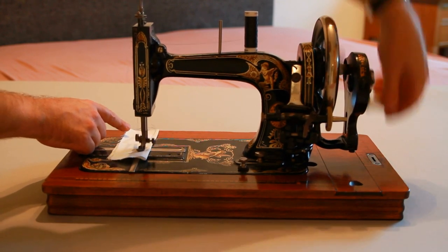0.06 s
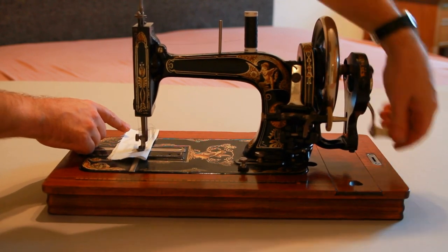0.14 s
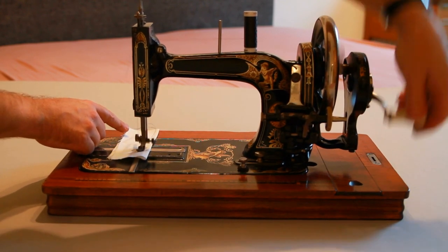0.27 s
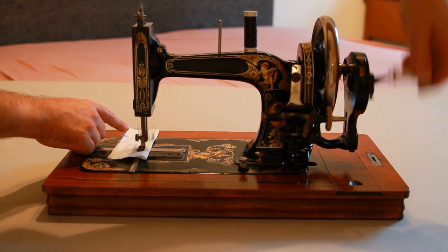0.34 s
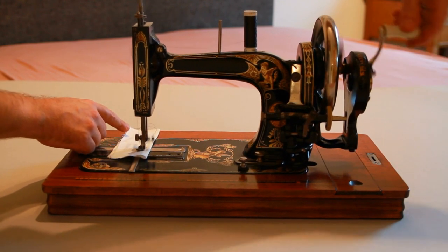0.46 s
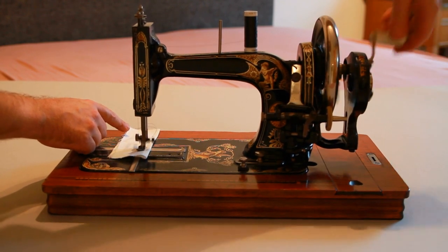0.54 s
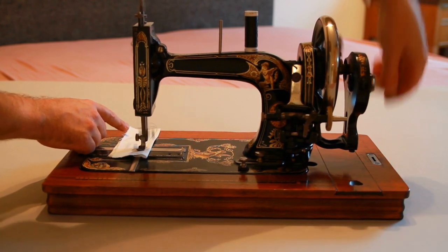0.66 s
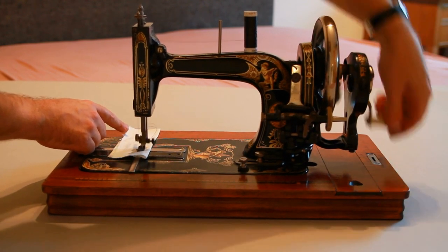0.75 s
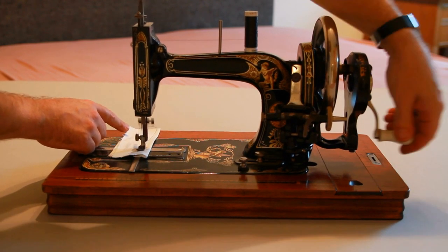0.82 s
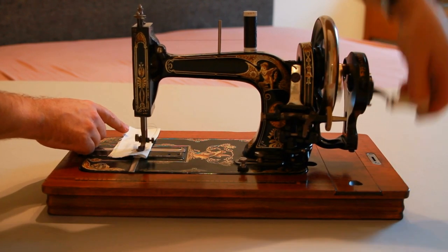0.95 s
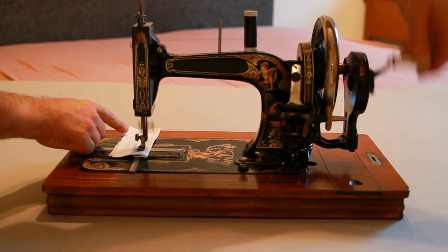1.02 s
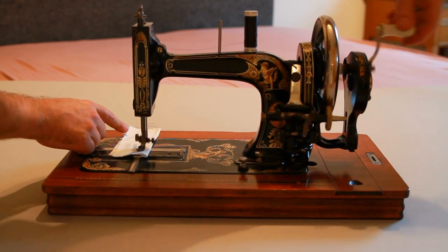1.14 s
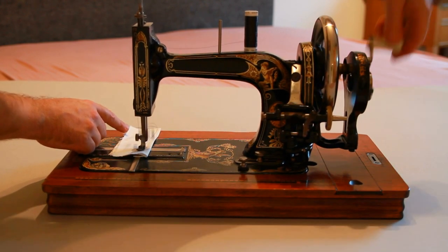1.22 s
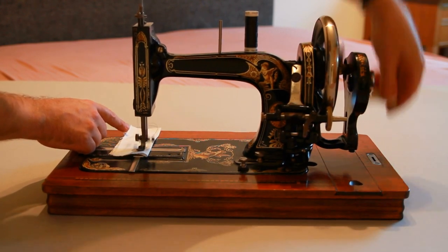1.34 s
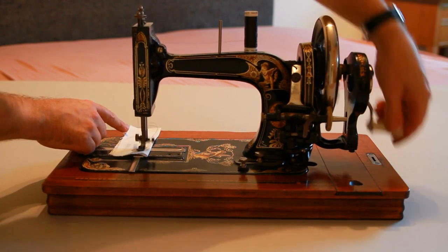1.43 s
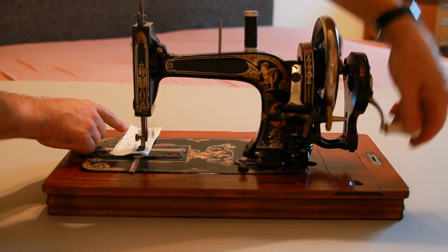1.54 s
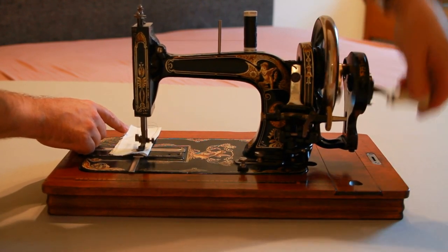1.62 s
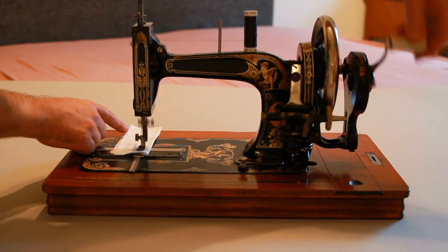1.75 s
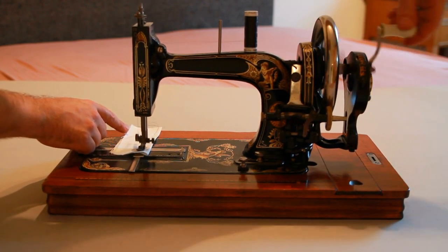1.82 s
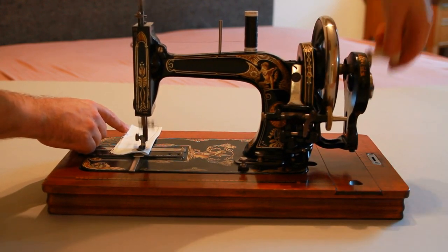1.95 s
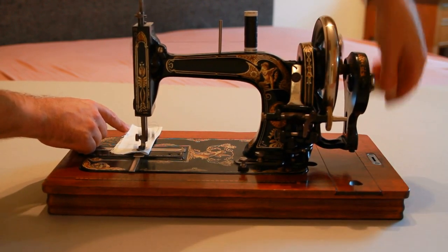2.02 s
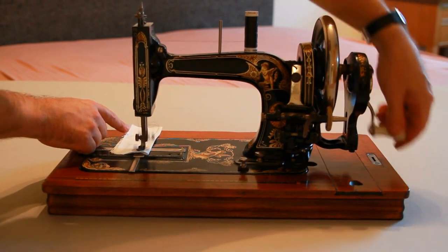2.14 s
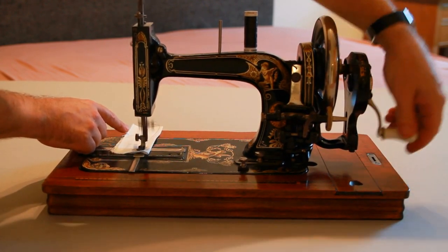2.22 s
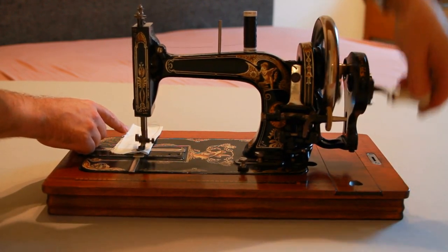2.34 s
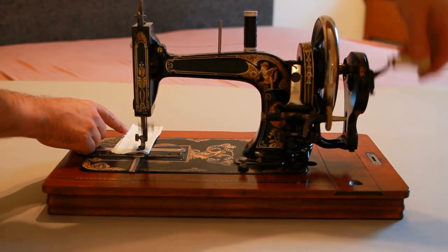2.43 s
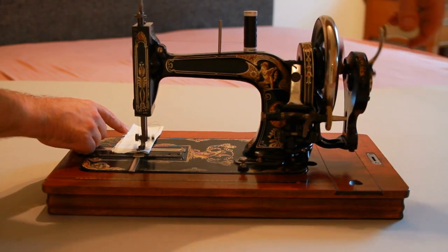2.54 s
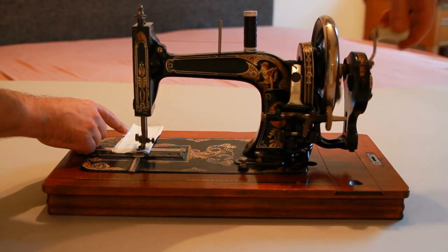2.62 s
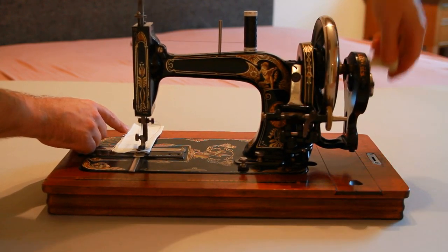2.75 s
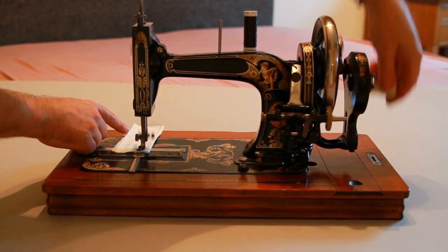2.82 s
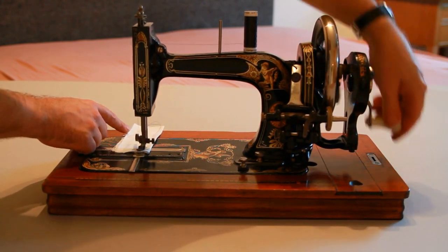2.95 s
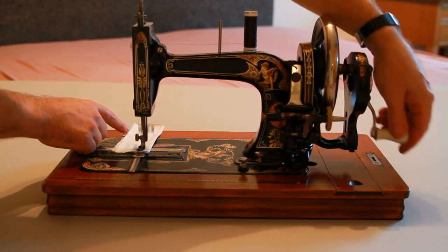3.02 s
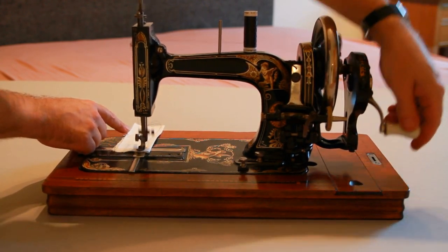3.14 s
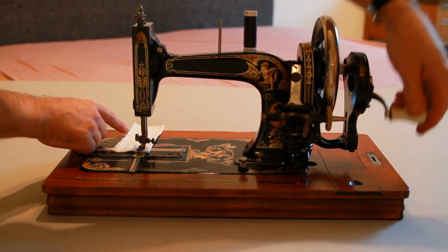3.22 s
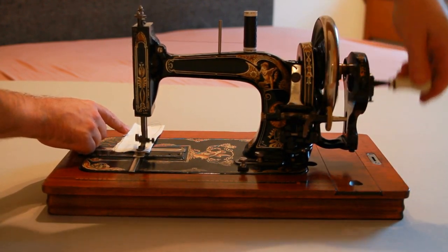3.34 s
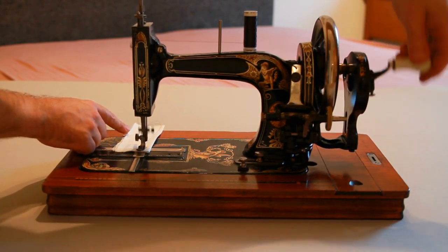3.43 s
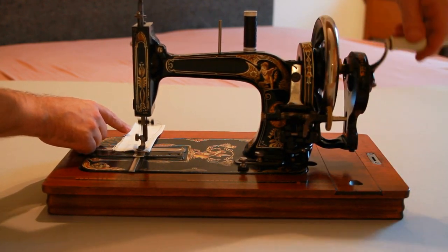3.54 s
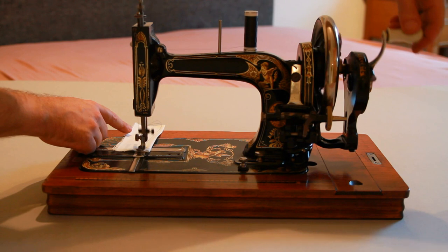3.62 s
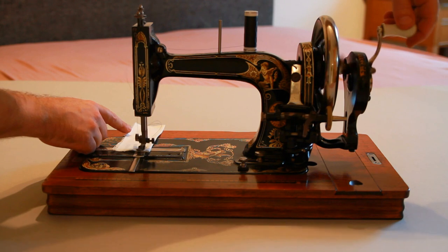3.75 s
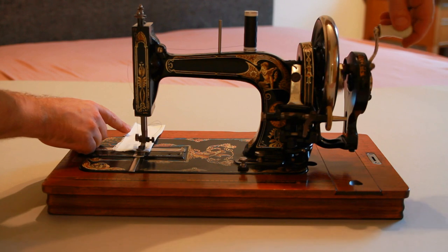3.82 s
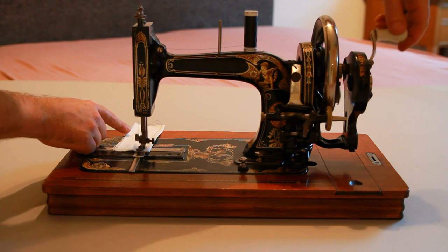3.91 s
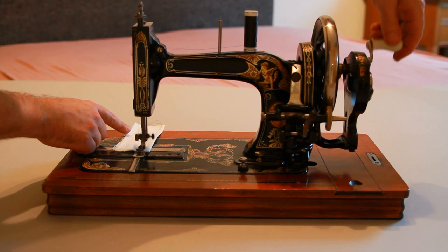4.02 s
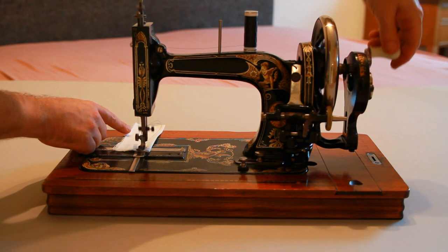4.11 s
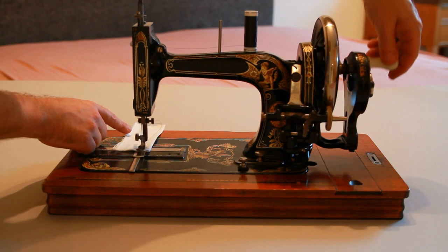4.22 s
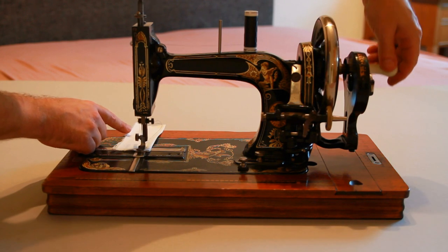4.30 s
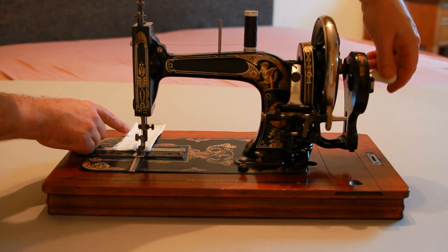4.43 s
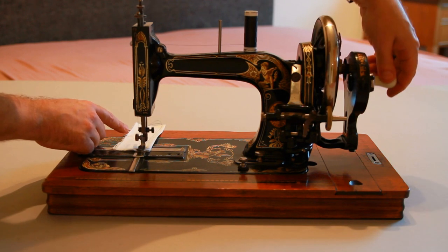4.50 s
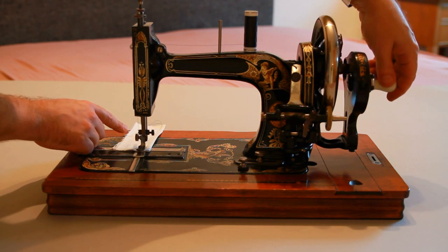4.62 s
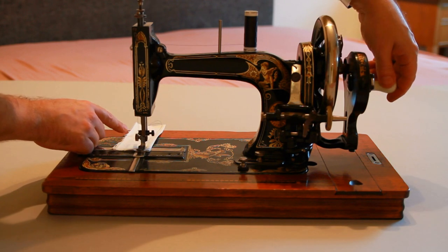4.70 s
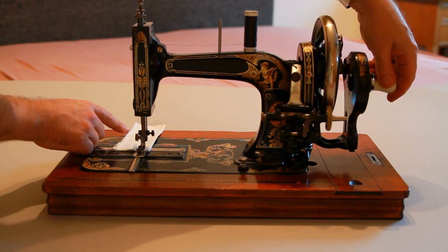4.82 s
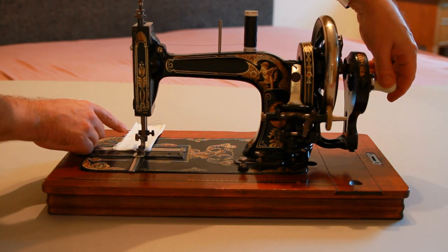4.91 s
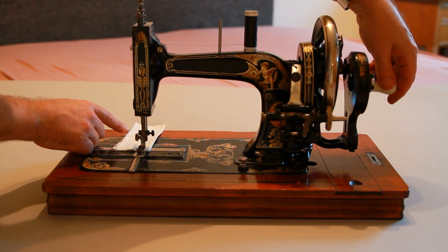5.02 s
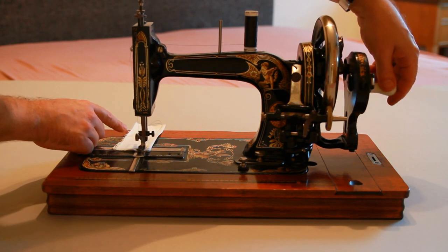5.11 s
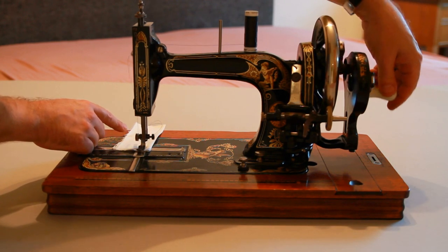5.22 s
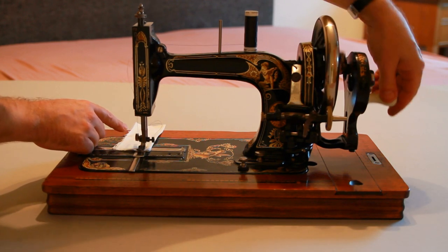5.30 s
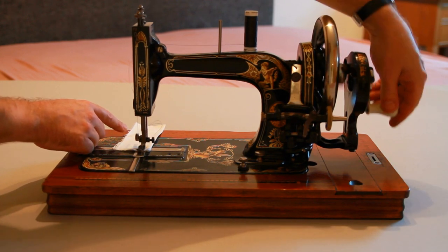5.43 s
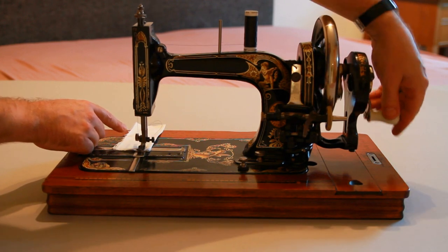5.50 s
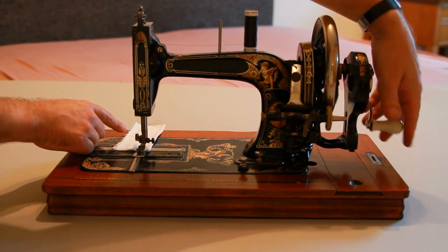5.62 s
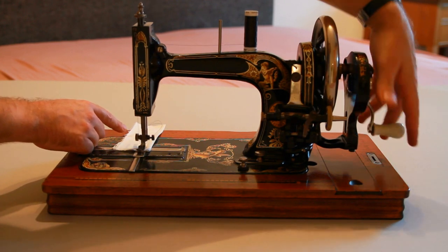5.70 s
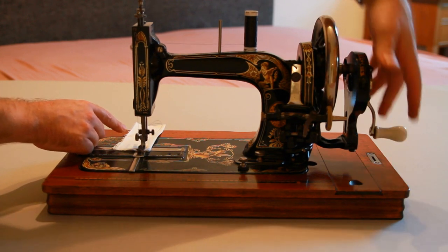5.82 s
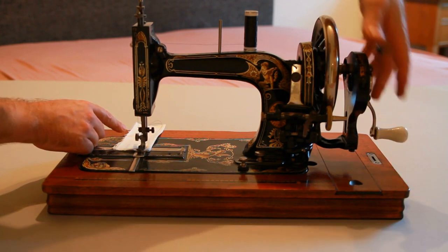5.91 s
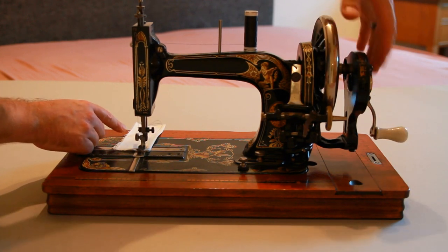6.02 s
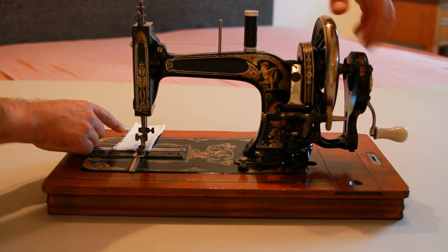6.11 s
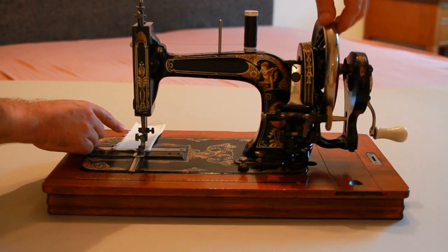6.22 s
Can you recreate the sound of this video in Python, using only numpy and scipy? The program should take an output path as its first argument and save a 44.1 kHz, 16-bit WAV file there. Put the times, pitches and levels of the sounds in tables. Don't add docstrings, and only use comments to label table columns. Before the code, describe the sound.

Close up in a quiet bedroom, a cast-iron hand-cranked sewing machine stitches at four to five stitches a second, each a cluster of sharp steel ticks, clacks and loose rattles. Gears whirr and the wooden base rumbles. It slows and stops before four seconds; then the crank clinks, a few dull knocks, tiny creaks and snaps follow over faint fan noise.

```python
import sys
import numpy as np
from scipy import signal
from scipy.fft import rfft, irfft
from scipy.io import wavfile

SR = 44100
rng = np.random.default_rng(int(sys.argv[2]) if len(sys.argv) > 2 else 0)


def store_pcm(level_fs):
    pcm = np.round(np.clip(level_fs, -1, 1) * 32767).astype(np.int16)
    wavfile.write(sys.argv[1], SR, np.atleast_2d(pcm).T)


def linear_from_db(decibels):
    return 10 ** (np.asarray(decibels, float) / 20)


N = 276066


def rms_one(x):
    return x / np.sqrt(np.mean(x ** 2) + 1e-20)


def at_hz(points, hz):
    point_hz, values = np.array(points).T
    return np.interp(np.log(np.maximum(hz, 1)), np.log(point_hz), values)


def band(x, low_hz, high_hz):
    return signal.sosfilt(signal.butter(2, [low_hz, high_hz], "band", fs=SR, output="sos"), x)


def coloured(x, spectrum):
    gain = linear_from_db(at_hz(spectrum, np.fft.rfftfreq(N, 1 / SR)))
    return rms_one(irfft(rfft(x) * gain, N))


def resonate(x, hz, width_hz):
    r, w = np.exp(-np.pi * width_hz / SR), 2 * np.pi * hz / SR
    return signal.lfilter([0, np.sin(w)], [1, -2 * r * np.cos(w), r * r], x + 1e-18)


def drift(per_s):
    r = np.exp(-2 * np.pi * per_s / SR)
    wander = signal.lfilter([1], [1, -2 * r, r * r], rng.standard_normal(N + SR))
    return rms_one(wander[SR:])


def grains(per_s, spread_db):
    sizes = linear_from_db(spread_db * np.minimum(rng.exponential(1, N), 5)) * rng.choice([-1, 1], N)
    return rms_one(sizes * (rng.random(N) < per_s / SR))


def bursts(seconds, gains, fall_s, rise_s):
    clicks = np.full(N, 1e-12)
    np.add.at(clicks, (np.asarray(seconds) * SR).astype(int), gains)
    fall, rise = np.exp(-1 / (fall_s * SR)), np.exp(-1 / (rise_s * SR))
    return signal.lfilter([1 - rise], np.convolve([1, -fall], [1, -rise]), clicks)


def strike(seconds, level_db, modes, luck_db, fall_s):
    noise = rng.standard_normal(N)
    luck = rng.standard_normal((len(seconds), len(modes)))
    out = np.zeros(N)
    for k, (hz, width_hz, db) in enumerate(modes):
        push = bursts(seconds, linear_from_db(level_db + db + luck_db * luck[:, k]), fall_s, rise_s=.0001)
        out += resonate(noise * push, hz, width_hz)
    return out


def ring_each(seconds, level_db, ring_hz, width_hz, rise_cycles=1.0):
    out, t = np.zeros(N + SR), np.arange(SR // 4) / SR
    for s, db, hz in zip(seconds, level_db, ring_hz):
        i = int(s * SR)
        swell = 1 - np.exp(-t * hz / rise_cycles)
        out[i:i + len(t)] += linear_from_db(db) * np.sin(2 * np.pi * hz * t) * np.exp(-np.pi * width_hz * t) * swell
    return out[:N]


# start in seconds, length in seconds, level in dB.
HUM_SWELLS = [
    (3.772, 0.094, -48),
    (4.04, 0.32, -57),
    (4.493, 0.41, -54),
    (5.09, 0.13, -57),
    (5.71, 0.13, -61),
    (6.107, 0.28, -53),
]


def hum_level():
    t, edge_db_per_s = np.arange(N) / SR, 300
    swells = []
    for s, length, db in HUM_SWELLS:
        outside_s = np.maximum(0, np.maximum(s - t, t - s - length))
        swells.append(db - edge_db_per_s * outside_s)
    return np.max(swells, axis=0)


# frequency in Hz, level in dB per Hz.
FAN = [(18, -54), (30, -6), (118, -34), (163, -18.5), (255, -30.5), (323, -20), (399, -15.5), (625, 7),
       (792, 8.5), (928, -6), (1210, -4.5), (1530, -10.5), (12700, -16.5), (15200, -20.5), (16500, -52)]


def background():
    hum_hz, hum_width_hz = 170, 14
    hum = resonate(resonate(rng.standard_normal(N), hum_hz, hum_width_hz), hum_hz, hum_width_hz)
    whine = resonate(rng.standard_normal(N), 930, width_hz=27.1)
    fan = coloured(rng.standard_normal(N), FAN) + linear_from_db(-5.5) * rms_one(whine)
    return linear_from_db(-56) * fan + linear_from_db(hum_level()) * rms_one(hum)


# frequency in Hz, time to fade by 60 dB in seconds.
ROOM_FADE = [(200, 0.62), (1000, 0.33), (4000, 0.21), (10000, 0.16), (16000, 0.11)]


def room(x):
    t, edges = np.arange(SR // 2) / SR, 100 * 2 ** np.arange(0, 7.6, .5)
    noise, tail = rng.standard_normal(len(t)), np.zeros(len(t))
    for low, high in zip(edges, edges[1:]):
        tail += band(noise, low, high) * linear_from_db(-60 * t / at_hz(ROOM_FADE, np.sqrt(low * high)))
    tail *= 1 - np.exp(-(t / .011) ** 2)
    return signal.fftconvolve(x, tail / np.sqrt(np.sum(tail ** 2)))[:N]


# time in seconds, force in dB.
CRANK_FORCE = [(0.0, 2.5), (1.0, -0.5), (2.0, 0), (2.74, -3), (3.2, -5.5), (3.47, -6), (3.59, -10),
               (3.75, -13.5), (3.96, -5.5), (4.06, -2), (4.2, -20.5), (4.6, -29), (5.32, -23.5),
               (5.4, -20.5), (5.67, -7.5), (5.76, -17), (5.86, -24), (6.26, -24)]


def motion():
    t = np.arange(N) / SR
    force_db = np.interp(t, *np.transpose(CRANK_FORCE))
    rise_s, shuttle_fall_s = 0.021, 0.02
    push_s, stroke_s = np.array(FEED)[1::2, 0], np.array(SHUTTLE)[:, 0]
    feed = bursts(push_s - rise_s, 0.99, 0.028, rise_s)
    shuttle = bursts(stroke_s - rise_s, 0.91, shuttle_fall_s, rise_s)
    return_s = stroke_s + 0.28 * np.gradient(stroke_s)
    shuttle += bursts(return_s, linear_from_db(-16), shuttle_fall_s, rise_s)
    shuttle += linear_from_db(-12.5) * np.exp(-t / shuttle_fall_s)
    knock_s, knock_db = np.transpose(KNOCKS)[:2]
    gear_jolts = bursts(knock_s, linear_from_db(knock_db - 24), fall_s=0.027, rise_s=0.0069)

    def loaded(steady_db, feed_load_db, shuttle_load_db):
        return linear_from_db(steady_db) * (1 + linear_from_db(feed_load_db) * feed + linear_from_db(shuttle_load_db) * shuttle)

    rumble = loaded(-33 + force_db, -5.5, -13)
    whirr = loaded(-46 + force_db, 8.5, 3)
    slide = loaded(-43 + 0.46 * force_db, 13.5, 29.5)
    return 20 * np.log10([rumble + gear_jolts, whirr, slide])


# frequency in Hz, width in Hz, level in dB.
BASE = [(123.8, 8.4, -12.5), (181.5, 26, -10), (214.2, 5.4, -3.5), (252.7, 29, -1), (285.4, 27, 0),
        (323, 17.6, 0.5), (370.7, 13.2, -5.5), (380, 63, -6), (447.6, 34.4, -2.5), (587, 22, -6),
        (711, 39, -9.5), (777.5, 17, -16)]


def wooden_base(rumble_db):
    teeth = grains(per_s=350, spread_db=0.5)
    loads = [linear_from_db(1.83 * drift(per_s=6.2)) for _ in range(4)]
    rumble = np.zeros(N)
    for k, (hz, width_hz, db) in enumerate(BASE):
        mode = resonate(teeth * loads[k % 4], hz, width_hz)
        rumble += linear_from_db(db) * np.sqrt(width_hz) * mode * (-1) ** k
    return linear_from_db(rumble_db + 1.5) * rms_one(rumble)


# frequency in Hz, level in dB per Hz.
WHIRR = [(290, -7), (500, -6.5), (585, -6), (911, -6.5), (977, -10), (1430, -5.5), (4000, -26.5),
         (5200, -23), (8800, -120)]
# frequency in Hz, level in dB per Hz.
SLIDE = [(1500, -1), (2600, 4), (5000, 2), (6500, -2.5), (10000, -2), (15000, -6), (16500, 1.5)]


def running_gear(whirr_db, slide_db):
    mesh = coloured(grains(per_s=1500, spread_db=2.5), WHIRR)
    streaks = np.zeros(N)
    for hz in np.geomspace(600, 2400, num=7):
        streaks += linear_from_db(4.5 * drift(per_s=6)) * band(mesh, hz, hz * 1.12)
    grit = coloured(grains(per_s=9000, spread_db=2.0), SLIDE)
    ringing = rms_one(sum(linear_from_db(db) * np.sqrt(w) * resonate(grit, hz, w) for hz, w, db in STEEL))
    whirr = linear_from_db(whirr_db + 0.4) * rms_one(mesh + 0.27 * streaks)
    return whirr + linear_from_db(slide_db - 12.0) * (grit + 0.2 * ringing)


# start in seconds, peak level in dB, ringing pitch in Hz.
THUMPS = [(0.032, -26, 304), (0.057, -25, 333), (0.098, -21.5, 317), (0.136, -24.5, 288), (0.16, -27, 310),
          (0.184, -27, 328), (0.238, -27, 314), (0.268, -22, 326), (0.299, -24.5, 345), (0.361, -26, 244),
          (0.402, -28, 307), (0.484, -28, 307), (0.521, -19.5, 337), (0.57, -30, 284), (0.601, -32, 336),
          (0.66, -27, 223), (0.69, -24, 320), (0.8, -20, 315), (0.863, -23, 348), (0.89, -27, 326),
          (0.95, -22, 334), (0.984, -21.5, 226), (1.029, -31.5, 260), (1.146, -39.5, 304),
          (1.235, -42, 383), (1.266, -32, 321), (1.315, -26, 320), (1.363, -21, 309), (1.446, -29, 275),
          (1.539, -32.5, 297), (1.638, -24, 280), (1.67, -31, 237), (1.73, -29, 351), (1.823, -38, 307),
          (1.856, -30, 341), (1.912, -27, 334), (1.971, -25.5, 265), (2.074, -22.5, 318), (2.122, -26, 250),
          (2.15, -25.5, 285), (2.208, -23, 334), (2.278, -27, 323), (2.324, -20, 290), (2.392, -43, 348),
          (2.629, -40, 317), (2.748, -25, 302.5), (2.886, -27, 301), (2.937, -24, 339), (3.011, -28.5, 295),
          (3.081, -29.5, 331), (3.235, -26, 320), (3.261, -25, 294), (3.398, -37, 302), (3.433, -36, 275),
          (3.46, -43, 277), (3.495, -33, 299)]
# start in seconds, peak level in dB, ringing pitch in Hz.
TAPS = [(0.098, -24, 774), (0.133, -18, 576), (0.18, -29, 472), (0.295, -29, 724), (0.338, -34, 474),
        (0.511, -42, 420), (0.591, -30, 611), (0.642, -38, 608), (0.75, -20, 593), (0.774, -20, 437),
        (0.819, -21, 538), (0.93, -29, 600), (0.967, -30, 630), (1.003, -26.5, 452), (1.219, -36, 450),
        (1.375, -29, 453), (1.411, -23, 587), (1.588, -34, 596), (1.613, -31, 435), (1.668, -25, 446),
        (1.705, -42, 454), (1.824, -31, 800), (1.85, -33, 690), (1.947, -32, 435), (2.082, -33, 700),
        (2.111, -26, 585), (2.139, -18.5, 577), (2.168, -22, 619), (2.323, -30, 720), (2.397, -41, 657),
        (2.482, -33, 440), (2.769, -38, 587), (2.883, -33, 587), (2.915, -25.5, 697), (2.935, -27, 600),
        (2.979, -25, 550), (3.029, -27, 597), (3.364, -21, 443), (3.4, -26, 450), (3.473, -34, 530)]


def jolts():
    s, db, hz = np.transpose(THUMPS)
    thumps = ring_each(s - .004, db + 2.5, hz, width_hz=18.8, rise_cycles=3.27)
    s, db, hz = np.transpose(TAPS)
    return thumps + ring_each(s, db - .5, hz, width_hz=43, rise_cycles=2.5)


# start in seconds, peak level in dB, main pitch in Hz, brightness in dB.
KNOCKS = [(3.617, -47, 300, -17), (3.782, -28, 313, -6), (3.986, -29, 294, -11), (4.02, -23, 273, -8),
          (4.213, -34, 320, 3), (4.393, -37, 438, -4), (4.393, -36, 317, -25), (4.394, -31, 605, -25),
          (4.491, -33.5, 318, -21), (4.984, -46, 570, 11), (5.389, -31, 330, -2), (5.439, -32.5, 254, -9),
          (5.566, -30, 291, 1.5), (5.666, -31, 336, 0), (5.727, -30, 323, 1.5), (5.885, -31, 294, -19),
          (5.902, -27, 253, -28), (6.008, -31, 302, -5)]


def knocks():
    s, peak_db, ring_hz, bright_db = np.transpose(KNOCKS)
    thud = ring_each(s, peak_db, ring_hz, width_hz=45)
    upper_modes = [m for m in BASE if m[0] > 430]
    return thud + strike(s, peak_db + bright_db - 20.5, upper_modes, luck_db=1.5, fall_s=0.00078)


# start in seconds, level in dB, pitch in Hz, fall time in seconds.
CREAKS = [
    (3.601, -70.5, 1790, 0.18),
    (3.811, -58, 1430, 0.012),
    (4.2, -70, 1770, 0.13),
    (5.392, -73, 1400, .01),
    (5.436, -68, 1440, 0.022),
    (5.507, -76, 1430, .02),
    (5.89, -73, 1810, 0.021),
]


def creaks():
    out, t = np.zeros(N + SR), np.arange(SR // 3) / SR
    for s, db, hz, fall_s in CREAKS:
        i = int(s * SR)
        rub = linear_from_db(db) * rng.standard_normal(len(t)) * np.exp(-t / fall_s)
        out[i:i + len(t)] += resonate(rub, hz, width_hz=220)
    return out[:N]


# frequency in Hz, width in Hz, level in dB.
STEEL = [(3800, 350, -6), (4300, 300, -6), (4900, 300, -5), (5680, 350, -5), (7050, 280, -5),
         (7950, 400, -6), (9000, 350, -5), (10230, 220, -2), (11150, 400, -3), (12550, 400, -2),
         (13050, 300, 0), (13730, 300, 0), (14900, 500, -2)]
SHARE_EDGES_HZ = (1300, 3400, 7000, 16000)


def contacts(s, levels_db):
    noise, out = rng.standard_normal(N), np.zeros(N)
    rattle = rms_one(signal.lfilter([1], [1, -.97], np.abs(grains(per_s=450, spread_db=3))))
    for low, high, level_db, trim_db in zip(SHARE_EDGES_HZ, SHARE_EDGES_HZ[1:], levels_db, (-1.5, 3.5, 4.5)):
        crack = bursts(s, linear_from_db(level_db + trim_db), fall_s=.0013, rise_s=.0005)
        settle = rattle * bursts(s, linear_from_db(level_db + trim_db - 21), fall_s=.016, rise_s=.004)
        out += (crack + settle) * rms_one(band(band(noise, low, high), low, high))
        modes = [m for m in STEEL if low <= m[0] < high]
        out += strike(s, level_db - 26.5, modes, luck_db=7.5, fall_s=0.0032)
    return out


# start in seconds, ring level in dB, ring pitch in Hz, snap level in dB, dullness in dB.
HANDLING = [(3.6128, -37, 2470, -58, 13), (3.777, -50, 1220, -70, -1), (3.81, -57, 1480, -49, 2),
            (3.9055, -42, 3080, -44, 3.5), (3.923, -61, 1430, -43, 2), (3.9562, -65, 1500, -53, -9),
            (3.9838, -29, 1160, -24.5, -2), (4.0165, -35, 2900, -26, -7), (4.0294, -25, 2240, -21, -4.5),
            (4.215, -58, 1740, -45.5, -7), (4.2647, -56, 1670, -58, 8), (4.3906, -35, 1910, -59, 12),
            (4.491, -43, 1230, -68, 15), (4.9798, -48, 1920, -72.5, 22), (5.3881, -43, 1370, -60, 1.5),
            (5.4325, -52, 1480, -50, -5), (5.5065, -55, 1410, -55, -11), (5.5647, -54, 1820, -21.5, -4),
            (5.6647, -34, 1140, -44, 2.5), (5.726, -24, 2300, -33.5, 1), (5.7796, -41, 1580, -56, 6),
            (5.8888, -63, 1860, -50.5, 2.5), (6.0046, -51, 1150, -63, 3.5), (6.0635, -57, 1130, -59, -7)]
# start in seconds, level in dB.
CLUNKS = [
    (4.391, -41.5),
    (4.4942, -60),
    (4.9822, -39.5),
]
# frequency in Hz, width in Hz, level in dB.
CRANK = [(450, 40, 4), (670, 60, 4), (1340, 90, -2), (1570, 90, -2), (1920, 110, 1), (2230, 120, -8),
         (2900, 160, -11), (3420, 200, -8), (4500, 300, -14)]
# start in seconds, level in dB.
CHIRPS = [
    (5.433, -56),
    (5.440, -61),
    (5.509, -68),
    (5.520, -64),
]


def handling():
    s, ring_db, ring_hz, snap_db, dull_db = np.transpose(HANDLING)
    clinks = ring_each(s, ring_db + 7, ring_hz, width_hz=320)
    clunk_s, clunk_db = np.transpose(CLUNKS)
    held_crank = [(hz, w * 2.4, db) for hz, w, db in CRANK]
    clunks = strike(clunk_s, clunk_db - 27.5, held_crank, luck_db=5.5, fall_s=0.032)
    chirp_s, chirp_db = np.transpose(CHIRPS)
    chirps = strike(chirp_s, chirp_db, [(4740, 440, 0), (10100, 900, 1.5)], luck_db=2.5, fall_s=.004)
    snaps = contacts(s, np.array([ring_db, snap_db + dull_db, snap_db]) - 1)
    return snaps + clinks + chirps + clunks


# start in seconds, level in dB.
FEED = [(0.059, -23), (0.0876, -17), (0.2644, -21), (0.291, -16), (0.4777, -22), (0.506, -15),
        (0.6955, -22.5), (0.722, -19.5), (0.91, -22.5), (0.939, -16), (1.1319, -28.5), (1.16, -21),
        (1.3565, -24.5), (1.3835, -16), (1.5845, -28), (1.6111, -14), (1.8204, -20.5), (1.8499, -14.5),
        (2.0598, -32), (2.0818, -20.5), (2.297, -31), (2.321, -17.5), (2.576, -32), (2.5955, -20.5),
        (2.886, -36.5), (2.8973, -25), (3.2346, -44), (3.254, -28.5)]
# frequency in Hz, width in Hz, level in dB.
CAM_LIFT = [(2110, 220, -1), (1250, 200, -4)]
# frequency in Hz, width in Hz, level in dB.
CAM_PUSH = [(540, 83, 2.4), (770, 60, 2.5), (1400, 260, 2)]


def feed_cam():
    lift_s, push_s = np.array(FEED)[0::2, 0], np.array(FEED)[1::2, 0]
    force_db = np.interp(push_s, *np.transpose(CRANK_FORCE))
    rub = strike(lift_s - 0.00915, -56.5 + force_db, CAM_LIFT, luck_db=3.5, fall_s=0.022)
    knock = strike(push_s, -63.5 + force_db, CAM_PUSH, luck_db=4.0, fall_s=0.035)
    flick_db = -48 + force_db + 3.0 * rng.standard_normal(len(push_s))
    flick = bursts(push_s - 0.00656, linear_from_db(flick_db), fall_s=0.0022, rise_s=.0003)
    return rub + knock + flick * rms_one(band(rng.standard_normal(N), 9500, 16070))


PLATE_HZ = 10260
# frequency in Hz, width in Hz, level in dB.
FEED_MODES = [(4500, 500, -6), (4900, 400, 0), (5250, 400, 2), (5650, 400, 0), (6050, 450, -5)]


def ticks(s, level_db):
    snap = bursts(s, linear_from_db(level_db - 18.5), fall_s=0.0012, rise_s=.0004)
    buzz = bursts(s, linear_from_db(level_db - 20.5), fall_s=0.014, rise_s=0.0047)
    scrapes = grains(per_s=1800, spread_db=3.0) * linear_from_db(3.0 * drift(per_s=60))
    rasp = np.zeros(N)
    for k, (hz, width_hz, db) in enumerate(FEED_MODES):
        rasp += linear_from_db(db) * resonate(scrapes, hz, width_hz) * (-1) ** k
    rung = strike(s, level_db - 25.5, FEED_MODES, luck_db=1.0, fall_s=0.0016)
    bright_edge = strike(s, level_db - 40.0, [(PLATE_HZ, 700, 0), (14500, 2000, 3)], luck_db=8.5, fall_s=0.003)
    return bright_edge + band(rung + (snap + buzz) * rms_one(rasp), 3800, 7000)


# start in seconds, level in dB, dullness in dB.
NEEDLE = [(0.1146, -15.5, -1.5), (0.3198, -13.5, -3.5), (0.5351, -15.5, -3), (0.7532, -13.5, -4),
          (0.969, -17, -3.5), (1.1892, -26.5, -3), (1.4133, -13, -2), (1.643, -24, 0), (1.8798, -11, -8),
          (2.114, -16, -0.5), (2.3587, -18.5, -2.5), (2.637, -35.5, 6.5), (2.9456, -31, 1),
          (3.3113, -31.5, -2.5)]
# start in seconds, level in dB, dullness in dB.
SHUTTLE = [(0.1516, -14, -7.5), (0.357, -14.5, -9.5), (0.5755, -13, -4.5), (0.7912, -16, -2.5),
           (1.009, -13.5, -18), (1.23, -13.5, -12), (1.4555, -30, -14), (1.684, -13.5, -5),
           (1.924, -16.5, -6), (2.1559, -14, -2), (2.4054, -15.5, -4), (2.687, -23, 4.5),
           (3.0031, -19.5, -7), (3.3925, -18.5, -6.5)]
# start in seconds, level in dB, dullness in dB.
RATTLES = [(0.141, -28.5, 3.5), (.128, -27.5, 3), (0.164, -34, -17), (.370, -30.5, -8), (.5295, -32.5, -1),
           (.547, -34, 0), (0.585, -36.5, -10), (1.022, -37, -6), (1.241, -29, -4), (1.425, -43, 0),
           (1.639, -39, 3), (1.693, -34, 6), (1.886, -22, -5.5), (1.91, -25.5, 3), (1.935, -16.5, -10),
           (2.368, -28, -3), (2.414, -29.5, 0.5), (2.698, -29, -12), (2.883, -50, 6), (2.977, -43, -3),
           (3.019, -32, -16), (3.028, -23.5, 0.5), (3.2615, -46, -9), (3.33, -41, 4), (3.378, -38, -3),
           (3.402, -29, -6), (3.429, -25, -1.5), (2.7996, -59, -12), (3.2984, -50, -12), (2.582, -56, 9.5),
           (0.3156, -29, -11), (0.3447, -32, 4), (0.379, -47.5, 3), (0.5628, -26, 0), (0.781, -27, 4),
           (0.809, -33, 3.5), (0.9972, -18.5, -0.7), (1.2183, -29.5, 5.5), (1.256, -23.5, -9),
           (1.6558, -27, -1.5), (1.6728, -25.5, 6.5), (1.9026, -28, 2), (1.916, -18, -13),
           (1.9466, -31.5, -12), (2.1456, -28.5, 2.5), (2.383, -17.5, -3.5), (2.3927, -21, 2),
           (2.6722, -21, 0), (2.961, -27.5, -9), (3.2344, -45, 13), (2.9854, -34, -4), (2.9913, -26.5, -8),
           (3.0098, -20, -7), (3.0372, -22, -1), (3.348, -36, 5), (3.3654, -26, -4), (3.4085, -22, -6.5),
           (3.4242, -24.5, -3), (3.438, -27.5, 0)]


def stitch_contacts():
    parts = (NEEDLE, -15), (SHUTTLE, -5), (RATTLES, -9)
    return np.transpose([(s, db + dull_db + body_db, db + dull_db, db)
                         for rows, body_db in parts for s, db, dull_db in rows])


# frequency in Hz, width in Hz, level in dB.
SHUTTLE_MODES = [(4800, 310, 0), (6900, 500, 0.5), (13500, 880, 10), (14330, 900, -16)]


def hard_touches():
    s, db, _ = np.transpose(NEEDLE + SHUTTLE)
    touch = bursts(s, linear_from_db(db - 2), fall_s=0.00027, rise_s=.00004)
    spike = touch * rms_one(band(rng.standard_normal(N), 9600, 14000))
    s, db, _ = np.transpose(SHUTTLE)
    tip = ring_each(s + .0003, db + 19.0, np.full(len(s), 13500), width_hz=1400)
    shell = strike(s, db - 16, SHUTTLE_MODES, luck_db=4.5, fall_s=0.0018)
    ping = strike(s, db - 22, [(PLATE_HZ, 170, 0)], luck_db=4.0, fall_s=0.0057)
    s, db, dull_db = np.transpose(RATTLES)
    carrier_db = db + np.minimum(dull_db, 0) - 24
    carrier = strike(s, carrier_db, [(7140, 180, 0)], luck_db=8.0, fall_s=0.0019)
    return spike + tip + shell + ping + carrier


# start in seconds, level in dB.
LATE_FEED = [
    (2.7847, -46),
    (3.116, -37),
    (3.818, -30),
    (4.2657, -55),
    (5.4315, -39),
    (5.440, -41),
    (5.5084, -41),
    (6.0626, -54),
]
# frequency in Hz, width in Hz, level in dB.
GEAR_MODES = [(740, 225, 2.5), (1158, 140, -1), (1430, 120, 4.5), (1980, 330, 9.5)]


def stitching():
    s, low_db, mid_db, high_db = stitch_contacts()
    dull = mid_db > high_db + 8
    clacks = contacts(s[~dull], np.array([low_db, mid_db, high_db])[:, ~dull])
    feed_bounces = [(t + 0.01, db - 7.5) for t, db in FEED]
    dull_clacks = list(zip(s[dull], mid_db[dull]))
    tick_s, tick_db = np.transpose(FEED + feed_bounces + LATE_FEED + dull_clacks)
    plate = strike(s, high_db - 43, [(PLATE_HZ, 200, 0)], luck_db=2.5, fall_s=.035)
    grind = strike(s, np.minimum(mid_db, -22) - 39.5, GEAR_MODES, luck_db=1.5, fall_s=0.0097)
    into_base = strike(s, np.minimum(low_db, -28) - 32, BASE[4:], luck_db=6.5, fall_s=0.006)
    return clacks + ticks(tick_s, tick_db) + plate + into_base + grind


def scene():
    rumble_db, whirr_db, slide_db = motion()
    steel = stitching() + hard_touches()
    base_echo = linear_from_db(-11.5) * np.roll(steel, int(.0027 * SR))
    steel = linear_from_db(-1.0) * (steel + base_echo)
    blows = steel + handling() + knocks() + creaks() + feed_cam()
    turning = wooden_base(rumble_db - 6.0) + running_gear(whirr_db, slide_db)
    machine = blows + linear_from_db(-7.5) * room(blows) + jolts() + turning
    thin = signal.sosfilt(signal.butter(3, 100, "high", fs=SR, output="sos"), machine)
    return (thin + background())[None]


def low_pass(x):
    return signal.sosfilt(signal.butter(12, 15700, fs=SR, output="sos"), x)


def record(dry):
    rounded = dry / (1 + np.abs(dry / .95) ** 6) ** (1 / 6)
    return low_pass(rounded)


dry = scene()
out = record(dry)
store_pcm(out)
```